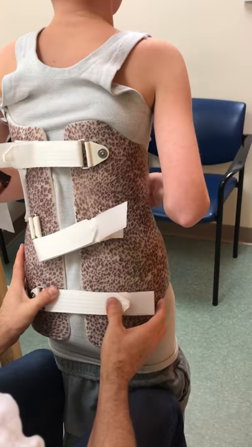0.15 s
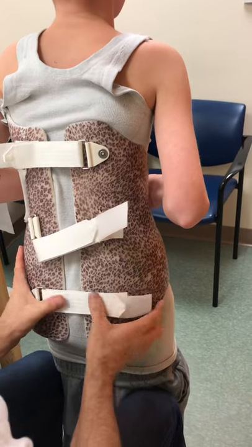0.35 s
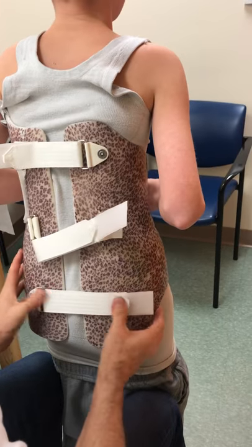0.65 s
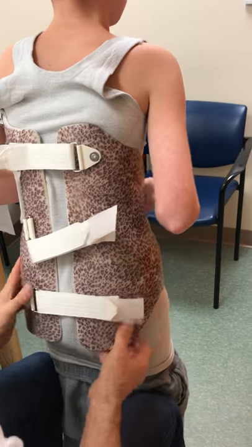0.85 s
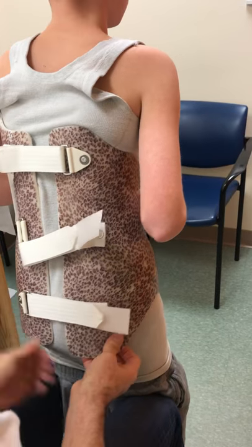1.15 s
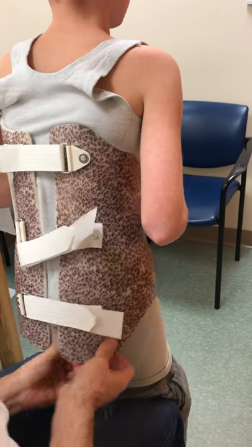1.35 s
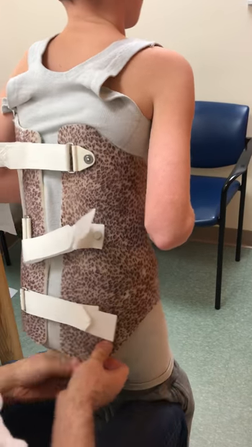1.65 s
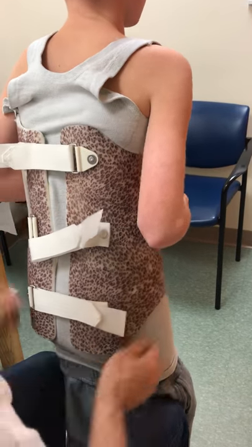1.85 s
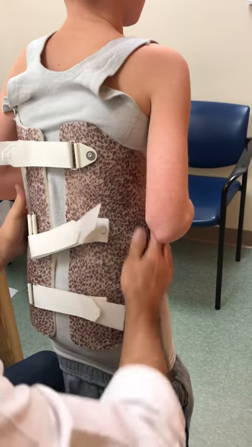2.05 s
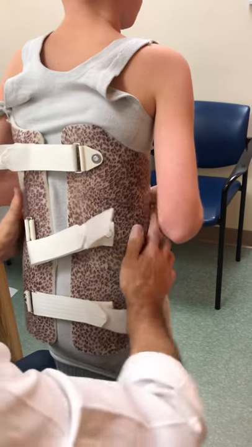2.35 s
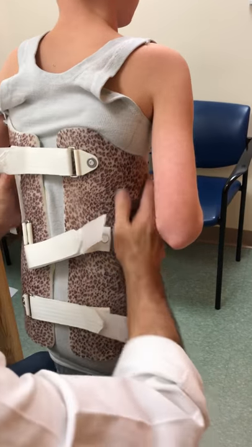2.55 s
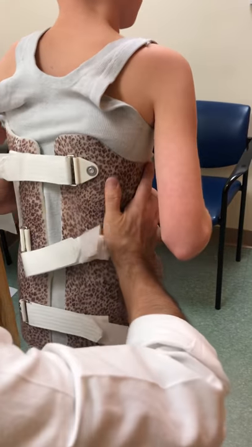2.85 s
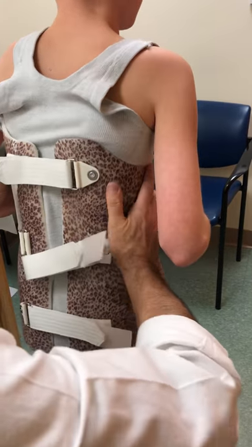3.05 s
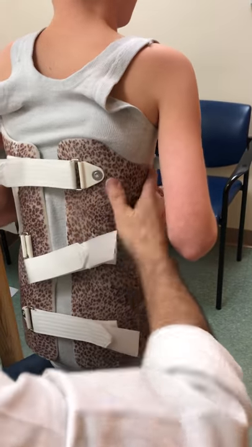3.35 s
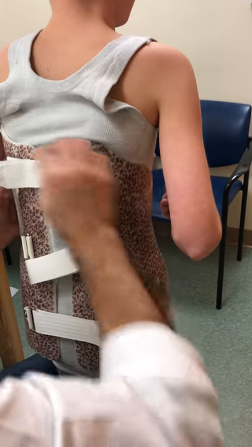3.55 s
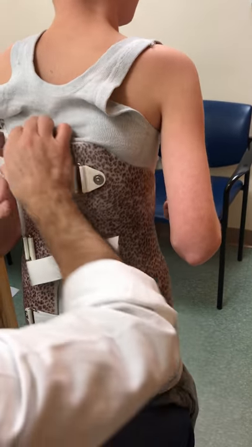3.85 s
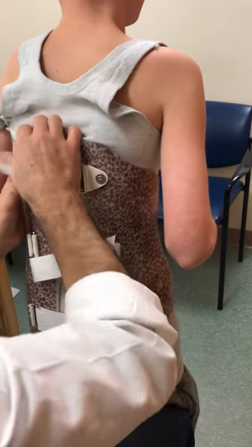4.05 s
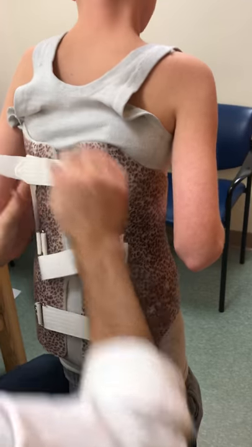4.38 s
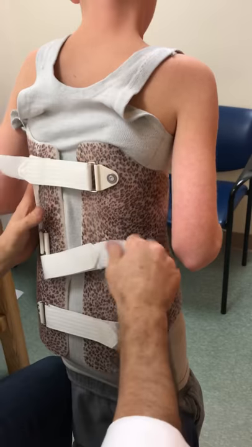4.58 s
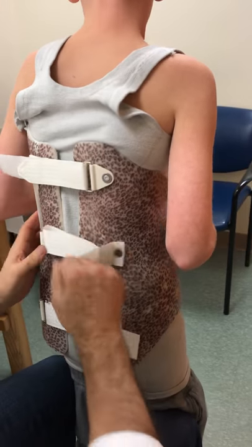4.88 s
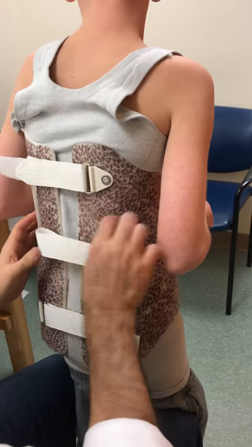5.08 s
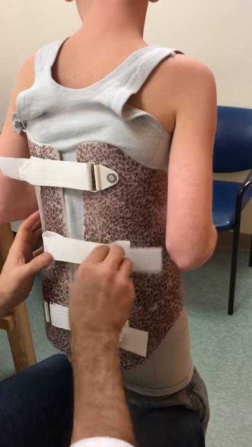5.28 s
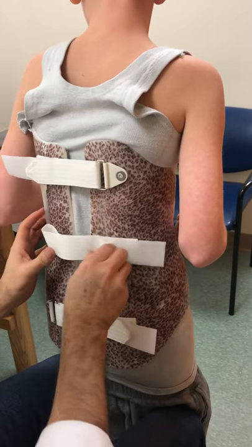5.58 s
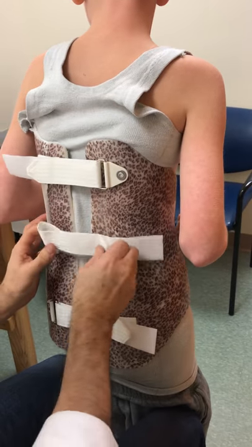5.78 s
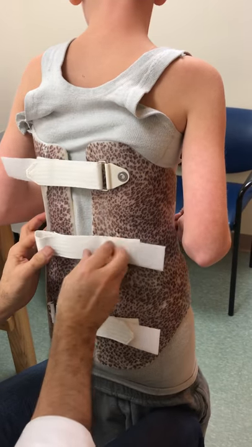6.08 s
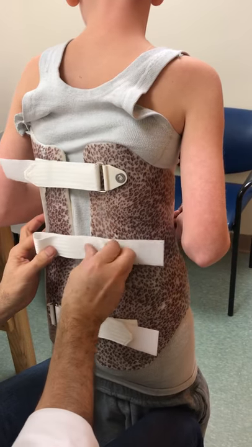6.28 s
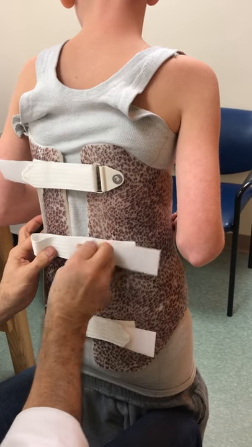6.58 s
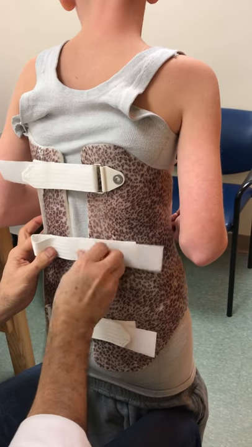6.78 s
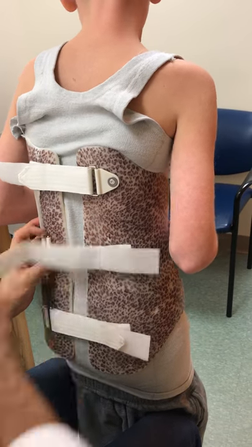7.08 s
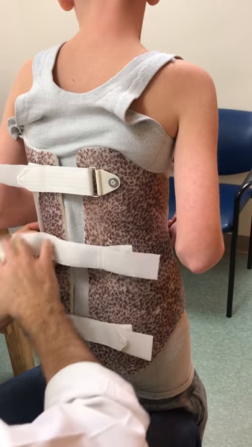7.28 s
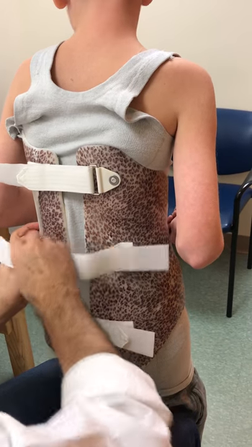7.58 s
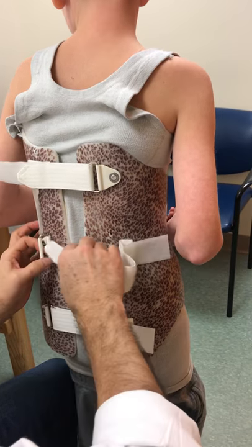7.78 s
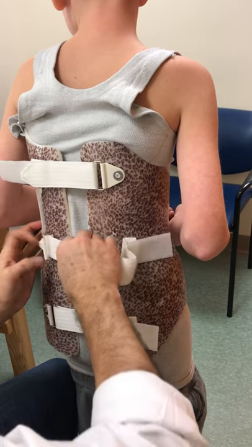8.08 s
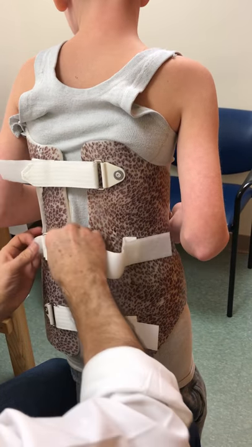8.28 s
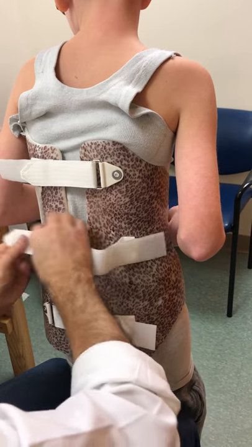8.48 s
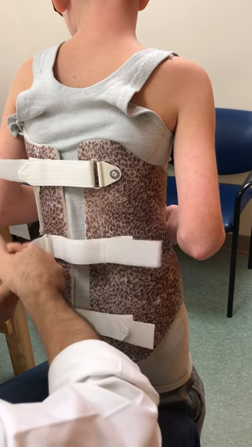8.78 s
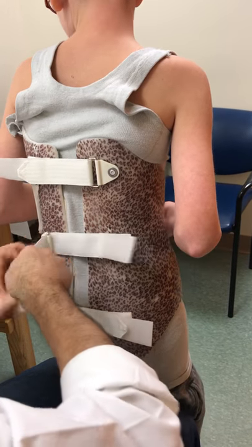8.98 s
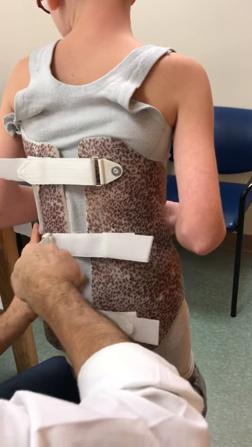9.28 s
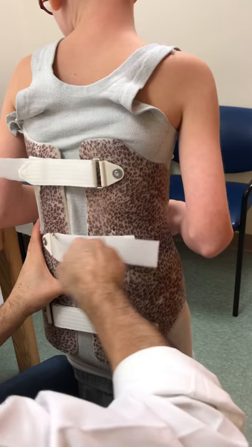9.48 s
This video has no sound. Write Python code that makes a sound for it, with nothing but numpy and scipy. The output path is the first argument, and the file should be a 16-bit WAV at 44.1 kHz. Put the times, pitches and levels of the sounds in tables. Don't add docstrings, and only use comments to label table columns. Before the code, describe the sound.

Close crackles and rustles of webbing on hard plastic, two loud fastener rips past the middle, then lighter scratchy fiddling in a small room.

```python
import sys
import numpy as np
from scipy import signal
from scipy.fft import rfft, irfft, next_fast_len
from scipy.io import wavfile
from scipy.ndimage import uniform_filter1d, map_coordinates

SR = 44100
rng = np.random.default_rng(int(sys.argv[2]) if len(sys.argv) > 2 else 0)


def magnitude_from_level(level_db):
    exponent = np.asarray(level_db, float) / 20
    return 10 ** exponent


def master_out(mix):
    frames = np.transpose(np.atleast_2d(mix))
    ceiling = np.clip(frames, -1, 1)
    pcm = np.round(ceiling * 32767).astype(np.int16)
    wavfile.write(sys.argv[1], SR, pcm)


N = 425124

# time in seconds, peak level in dB, tape
# ring in Hz, sizzle in dB against the peak.
HOOK_SNAPS = [(0.0607, -28.5, 3800, -4), (0.226, -39, 6800, 0), (0.231, -38, 3940, -9),
              (0.2395, -38.5, 6500, 0), (0.253, -41, 6800, -6), (0.264, -42, 6500, -2),
              (0.297, -41, 3700, -9), (0.352, -38, 3320, -10), (0.37, -52, 4500, -8),
              (0.659, -38, 3700, -14), (0.664, -38, 3700, -13), (0.72, -49, 3440, -15),
              (0.7505, -40, 6150, -2), (0.887, -42, 7500, -2), (0.98, -44, 8600, -2),
              (0.2899, -34, 3800, -8), (0.344, -35, 3900, -22), (0.4076, -31.5, 3800, -18),
              (0.552, -34, 5230, -5), (0.5814, -35, 6060, -13), (0.6488, -21, 3620, -30),
              (0.6978, -25, 3700, -28), (0.7325, -37, 3950, 5.5), (0.7442, -27.5, 3450, -23),
              (0.788, -36, 4260, -1), (0.832, -30, 3750, -5), (0.8938, -25.5, 6600, -23),
              (0.8979, -28, 3620, -23), (0.901, -35, 7140, -24), (0.997, -34.5, 8350, -6),
              (1.082, -40.5, 6960, -7), (1.3432, -30, 1320, 0), (1.4883, -29, 8850, -24),
              (1.5184, -34, 5570, -7), (1.5322, -35.5, 3940, 8), (1.631, -42, 3680, 12.5),
              (2.0367, -28, 4530, -28), (2.2192, -43, 8700, 3), (2.2277, -36, 7000, -12.5),
              (2.2784, -31, 4600, -8),
              (2.456, -45.5, 3240, -22), (2.934, -48, 1540, -23), (2.96, -37, 5840, -34),
               (3.029, -39.5, 1530, -33), (3.0524, -46, 3880, 0), (3.096, -47.5, 8200, 10),
               (3.215, -41.5, 1990, -10), (3.259, -38, 2220, -30), (3.347, -43, 1600, -32),
               (3.8166, -31, 8400, 3), (3.827, -29, 9000, -21), (3.8476, -30.5, 6250, -14),
               (4.0977, -32, 4330, -7), (4.255, -41, 7500, -4), (4.333, -24.5, 1680, -6),
               (5.363, -43.5, 7950, 14), (4.4852, -34, 9000, -20), (4.704, -42, 6450, -3),
               (4.7138, -28, 2900, -11), (4.7861, -27.5, 3700, -19), (4.7954, -37.5, 12000, 3),
               (4.897, -24, 3480, -2), (5.0745, -45.5, 7400, 5), (5.095, -28, 4440, 5),
               (5.378, -29, 3780, -30), (5.465, -38, 7100, -1.5), (5.5448, -33, 4670, -4),
               (5.697, -37.5, 3750, 4), (5.739, -38, 4270, -2), (5.769, -33.5, 6400, -4.5),
               (5.856, -40.5, 2950, 8.5), (6.0025, -34, 7250, 2), (6.0914, -33, 3000, 1),
              (6.3027, -37, 3860, 7), (6.3255, -35.5, 3120, 2), (6.3334, -16.5, 2850, 5.5),
              (6.356, -18.5, 3180, -5.5), (6.3718, -17.5, 3850, -16.5), (6.3714, -19, 7100, -22),
              (6.3751, -23, 8950, -7), (6.3835, -39.5, 13000, 2), (6.3934, -19.5, 4200, 1.5),
              (6.4282, -26.5, 2580, -11), (6.513, -31, 1480, -30), (6.5845, -32, 2700, -3.5),
              (6.322, -33, 3340, 2), (6.3417, -28, 3000, -4), (6.349, -36.5, 3200, -4),
              (6.3627, -37, 7000, -3), (6.85, -35, 3400, 1), (6.899, -30, 4200, -2),
              (6.9024, -15, 4600, -13), (6.9298, -28, 7000, 0), (6.9412, -19, 6460, -4),
              (6.944, -18, 4500, -20), (6.9513, -10, 3800, -4.5), (6.953, -16, 7260, -1.5),
              (6.958, -20.5, 4080, -16.5), (6.9635, -18.5, 3600, -6), (6.9788, -20, 3720, -13),
              (6.9968, -25.5, 3800, -14), (7.0008, -15.5, 3500, -1), (7.0478, -9, 3570, -1),
              (7.0253, -17.5, 6200, 0.5),
              (6.6143, -18.5, 3970, 4), (6.6185, -12.5, 2440, -14), (6.6215, -24, 4000, -7),
             (6.6252, -8, 5100, -24), (6.627, -19, 3780, -8), (6.629, -19.5, 6900, -13),
             (6.631, -11.5, 3030, -2), (6.636, -20.5, 6700, -3), (6.64, -26, 3520, -12),
             (6.643, -19, 2780, -7), (6.646, -26, 7000, 5), (6.649, -16, 3700, -3),
             (6.653, -20.5, 3300, -1), (6.6565, -21, 2970, -2.5), (6.6631, -15.5, 3760, -10),
             (6.6684, -25, 3180, -9), (6.672, -24, 3580, -5.5), (6.676, -23, 3280, -1),
             (6.6786, -16, 3200, -22), (6.694, -20, 6300, -16),
              (7.345, -38, 14000, 6), (7.36, -37, 12000, -1), (7.369, -32, 8900, 2),
                (7.516, -51, 8000, -8), (7.575, -37, 12000, -1), (7.596, -31, 14000, -3),
                (7.624, -42, 13000, -1.5), (7.742, -47, 12000, 0), (9.39, -53, 12000, 2),
                (7.4412, -35, 3200, 8.5), (7.788, -46, 9000, -6), (7.7251, -40.5, 6650, -15),
                (7.8394, -32, 2300, 6), (7.863, -42, 8560, 0), (7.9028, -29, 4430, -1.5),
                (8.011, -44, 3300, -22), (8.061, -31.5, 7100, 3.5), (8.0902, -29.5, 6000, 1),
                (8.121, -28.5, 6700, -5), (8.2248, -32, 6170, -12), (8.2572, -39, 2700, 5),
                (8.289, -38.5, 4200, 3), (9.2007, -35, 11300, 4.5), (8.949, -46, 11900, 2),
                (9.001, -33.5, 3220, 3), (9.088, -41, 9000, 1), (9.233, -44.5, 12000, 5),
                (9.274, -47, 11900, 4), (9.317, -48, 7540, 1), (8.842, -34, 6500, -4),
                (8.385, -40.5, 1950, 7), (8.5, -36, 2920, -8), (8.52, -35.5, 1900, -13),
                (8.662, -33, 2740, -19), (8.705, -50, 6350, 12), (8.7495, -38, 7600, 7),
                (8.7803, -29, 8950, 4), (9.18, -30.5, 12000, 5), (9.411, -37, 6100, 3),
                (9.4261, -32.5, 8660, -1), (9.4413, -36, 8150, 2)]
# time in seconds, peak level in dB, tape ring in Hz, sizzle
# in dB against the peak.
SMALL_TICKS = [(0.108, -32, 8830, -8), (0.163, -34, 3890, 6), (0.186, -37, 3970, -6),
               (0.2202, -32, 4140, -8), (0.3226, -33.5, 3560, -9), (0.3346, -28, 3610, -14),
               (0.3822, -33, 3910, -10), (0.3912, -23.5, 3350, -10), (0.399, -25, 4090, -7),
               (0.469, -32, 8450, -3), (0.5896, -33, 6900, -6), (0.61, -24, 5600, -8),
               (1.013, -29, 11100, -8), (2.1554, -40, 2140, -8), (2.1992, -34.5, 2200, -17),
               (2.469, -42, 1660, -8), (2.844, -36, 11400, -6), (2.9026, -35.5, 5600, -13),
               (3.1207, -35, 5690, 1), (3.164, -38, 2130, 0), (3.284, -40, 4580, -12),
               (3.3872, -36.5, 1730, -18), (3.481, -41, 6450, 5),
               (5.1555, -27, 4220, -14), (5.375, -17, 2320, -15), (5.4586, -21.5, 6480, -4),
              (5.512, -30, 3770, -3), (5.688, -36, 3630, -1), (5.7357, -28, 4100, -6),
              (5.844, -42, 2770, -5), (5.8952, -36, 2450, 2), (5.9628, -31, 2880, -6),
              (6.281, -40, 3800, -8), (6.793, -31, 6470, -10), (6.8665, -24, 3150, -10),
              (8.275, -30, 2660, -6), (8.3004, -29, 3030, -3), (8.4057, -26.5, 2510, -5),
              (8.4538, -29.5, 3300, 7), (8.4774, -39, 1710, -8), (8.488, -23.5, 2920, -3),
              (8.548, -32, 1520, -8), (8.5706, -26, 2730, 1), (8.586, -26, 4300, 4.5),
              (8.038, -36, 6000, 1)]
TICK_DB = -9

# start in seconds, held time in seconds, rasp level in dB, shell level in dB,
# sizzle level in dB.
HAND_STROKES = [(0, 0.35, -57.5, -64, -59.5), (.39, 0.011, -48.5, -55, -54),
                (.58, 0.08, -53.5, -64.5, -55), (.7, 0.092, -54, -62, -56), (.89, 0.035, -51.5, -59, -61),
                (1.0, 0.054, -62, -64, -75), (1.49, 0.052, -51, -58.5, -50), (1.651, 0.011, -56, -59, -61),
                (1.717, 0.17, -63, -65.5, -64), (2.15, 0.016, -60.5, -61, -63),
                (.46, 0.15, -58, -65.5, -60), (2.5, 0.13, -56, -59.5, -60), (2.64, .13, -64.5, -69.5, -68),
                (2.85, 0.12, -71, -69.5, -77), (3.111, 0.018, -61, -65, -70), (3.25, 0.014, -71, -61, -77),
                (3.41, 0.16, -89, -70, -69.5), (3.52, 0.32, -68.5, -86, -77),
                (4.03, 0.038, -55.5, -66.5, -57), (3.827, 0.11, -50.5, -65.5, -52),
                (4.099, 0.043, -51, -66, -58), (4.2, 0.17, -55, -64, -60),
                (4.507, 0.0071, -59, -61.5, -65),
                (4.86, 0.016, -54, -62, -58), (5.341, 0.023, -51.5, -59, -57),
                  (5.439, 0.098, -53.5, -65.5, -57.5), (5.65, .28, -63, -70.5, -70),
                  (5.975, 0.041, -48, -61.5, -58), (6.085, 0.0059, -51, -60.5, -66),
                  (6.19, 0.13, -65.5, -93, -66), (6.44, 0.047, -57, -68, -62), (6.534, 0.02, -51, -58, -67),
                  (6.76, .01, -55, -72, -60), (6.847, 0.0044, -44, -59.5, -46.5),
                  (6.885, 0.069, -61, -67, -65),
                (7.25, 0.13, -61.5, -63.5, -62.5), (7.352, 0.036, -50, -62, -56),
                (7.455, 0.044, -52.5, -53.5, -59), (7.58, 0.024, -54, -54, -51.5),
                (7.735, 0.0045, -63, -76, -53), (8.083, 0.014, -46.5, -53, -64),
                (8.269, 0.028, -53.5, -55.5, -67), (8.369, 0.043, -58.5, -60.5, -57),
                (8.469, 0.029, -45.5, -53, -60), (8.585, 0.022, -47, -52.5, -62),
                (8.792, 0.055, -42.5, -49, -45), (8.7, 0.0064, -60, -56, -58),
                (8.963, 0.068, -47.5, -55, -53), (9.091, 0.16, -53, -85, -52.5),
                (8.015, 0.035, -62.5, -65, -78), (9.451, 0.061, -49.5, -70, -49),
                (9.62, .05, -58.5, -78, -58)]
# start in seconds, held time in seconds, rasp level in dB, shell level in dB, sizzle level in dB.
JOLTS = [(1.346, 0.097, -59.5, -76, -76), (4.335, 0.0059, -38, -54, -51), (4.715, 0.004, -51, -57, -71),
         (4.783, 0.013, -47, -47, -51), (4.899, 0.01, -47, -52, -62), (5.092, 0.058, -38.5, -43.5, -42.5),
         (5.379, 0.0087, -68, -51.5, -66), (7.842, 0.008, -51, -60, -68)]
# middle in seconds, half length in seconds.
PALM_GLIDES = [
    (2.62, 0.15),
    (5.172, 0.078),
]
# time in seconds, peak level in dB, pitch in Hz.
BUMPS = [(1.033, -42, 334), (1.344, -44, 1090), (1.883, -37, 650), (3.12, -39.5, 724), (3.419, -45, 650),
         (4.897, -27.5, 860), (4.8977, -31.5, 415), (2.037, -43, 1330), (8.012, -44, 620),
         (8.095, -37, 650), (8.275, -40.5, 637), (8.37, -41, 905), (8.478, -37.5, 420), (8.632, -36.5, 920),
         (3.895, -35, 885), (2.928, -46, 1010), (2.437, -49.5, 804), (4.784, -38, 634),
         (4.8955, -20.5, 1520), (5.155, -40, 400), (5.377, -28, 1690), (7.902, -31.5, 1100),
         (8.058, -37.5, 600), (8.128, -34, 684), (8.499, -42, 604), (8.661, -33.5, 680)]
# time in
# seconds, half length in seconds, pitch in Hz, level in dB.
SCRAPES = [
    (3.431, 0.023, 706, -49.5),
    (3.506, 0.012, 720, -50),
    (4.8, 0.018, 605, -48.5),
    (5.364, 0.0034, 6540, -42),
    (8.838, 0.023, 4700, -45),
    (9.499, 0.026, 3040, -46),
]
# time in seconds,
# force in dB, tape ring in Hz.
PULLS = [
    [(6.616, -25, 3500), (6.635, -40, 3800), (6.66, -43.5, 3400), (6.685, -56, 3400)],
    [(6.943, -27.5, 4500), (6.948, -32, 4500)],
    [(6.9645, -24.5, 3960), (6.98, -21.5, 3650), (6.995, -21.5, 3230), (7.02, -27, 5140),
     (7.039, -22, 5160), (7.05, -19, 3620), (7.06, -19.5, 4250), (7.073, -19, 4020), (7.08, -34.5, 3860)],
]

# frequency in Hz, gain in dB.
TAPE = [(900, -70), (1800, -14.5), (2600, 1), (3600, 5), (5000, 2), (7000, 4.5), (9000, 2), (10500, -13.5),
        (12000, 3.5)]
# frequency in Hz, gain in dB.
SIZZLE = [(8000, -6.5), (10000, 4.5), (11500, 4.5), (15500, 11)]
# centre in Hz, width in Hz, gain in dB.
SHELL = [(334, 80, -2.5), (654, 157, 3), (1080, 317, 0.5), (1510, 360, 2), (2300, 990, -7)]
# centre in Hz, width in Hz, rms level in dB.
HUM = [(60.6, 5.1, -58.5), (118, 9.3, -80.5), (175.3, 3.4, -62.5), (230.3, 1, -71.5)]
# frequency in Hz, density in dB per Hz.
AIR = [(12, -55), (22, -30), (44, -6.5), (107, -8.5), (337, -15), (459, -23.5), (1660, -26.5),
       (16000, -37.5)]
# frequency in Hz, time to fall 60 dB in seconds.
ROOM = [(300, 0.46), (1000, 0.29), (4000, 0.22), (14000, 0.17)]
# delay in seconds, level in dB.
WALLS = [(.0051, -15), (.009, -25)]
# frequency in Hz, gain in dB.
PHONE_RESPONSE = [(10100, 0), (10500, -3), (10900, -0.5), (15700, -6.5), (15950, -34.5), (17500, -31)]

AIR_DB = -52
HOOK_SWINGS = 0.62
SNAP_RISE_S = 0.00022
HUE_WIDTH = 0.95
SLACKENS = 0.12
PULL_KNOCK_DB, PULL_SIZZLE_DB = -6, 2
BRIGHTENS = 0.62
KNOCK_SHRINKS = 0.75
PULL_RING = 1.7
LOWEST_HZ = 392
RISE_DB_PER_S, FADE_DB_PER_S = 424, 278.5
JOLT_RISE_DB_PER_S = 4000
REST_DB = -79
PALM_CALMS_DB = 8
CRACKLE_MELTS = 0.17


def unit(x):
    return x / np.sqrt(np.mean(x ** 2) + 1e-20)


def along(points, hz):
    f, v = np.transpose(points)
    return np.interp(np.log(hz + 1), np.log(f + 1), v)


def filtered(x, response):
    m = next_fast_len(N + SR // 2)
    gain = response(np.fft.rfftfreq(m, 1 / SR))
    level = unit(np.abs(gain))
    return irfft(rfft(x, m) * level * np.exp(1j * np.angle(gain)), m)[:N]


def tape(f):
    return magnitude_from_level(along(TAPE, f))


def sizzling(f):
    return magnitude_from_level(along(SIZZLE, f))


def shell(f):
    total = 0
    for k, (centre, width, db) in enumerate(SHELL):
        mode = 1j * f * width / (centre * centre - f * f + 1j * f * width)
        total = total + (-1) ** k * magnitude_from_level(db) * mode
    return total


def scatter(times, shapes):
    at = np.round(times * SR).astype(int)[:, None] + np.arange(shapes.shape[1])
    return np.bincount(at.ravel(), shapes.ravel(), N + SR)[:N]


def snaps(times, db, ring_hz, knock_db, sizzle_db, ring=.5, life=.004, swings=HOOK_SWINGS):
    t = np.arange(260) / SR
    c = ring_hz[:, None]
    rise = 1 - np.exp(-(t / SNAP_RISE_S) ** 2)
    crack = rise * magnitude_from_level(-60 * t / life) * rng.standard_normal((len(times), len(t)))
    swing_s = swings * life
    sag = 1 + SLACKENS * (1 - t / (swing_s / 2))
    tone = rise * magnitude_from_level(-60 * t / swing_s) * np.sin(2 * np.pi * c * t * sag)

    def even(x):
        return x / np.sqrt(np.mean(x[:, :44] ** 2, 1))[:, None]

    def excite(level_db, shape):
        return scatter(times, magnitude_from_level(level_db)[:, None] * shape)

    f = np.fft.rfftfreq(len(t), 1 / SR)
    around_ring = 1j * f * c / (c * c - f * f + 1j * f * c * HUE_WIDTH)
    rattle = even(irfft(rfft(crack) * around_ring, len(t)))
    crack = even(crack)
    rasp = filtered(excite(db, rattle), tape) + excite(db, ring * tone)
    sizzle = filtered(excite(db + sizzle_db + 0.25, crack), sizzling)
    knock = filtered(excite(db + knock_db, crack), shell)
    return rasp + sizzle + knock


def ventilation():
    t = np.arange(N) / SR
    air = magnitude_from_level(AIR_DB - 7.5) * filtered(rng.standard_normal(N), lambda f: magnitude_from_level(along(AIR, f)))
    for hz, width, db in HUM:
        waver = filtered(rng.standard_normal(N), lambda f: 1 / (1 + ((f - hz) / width) ** 2))
        core = 0.2 * np.sin(2 * np.pi * hz * t)
        air = air + magnitude_from_level(db) * unit(waver + core)
    return air


def strokes(rows, jolts):
    t, power = np.arange(0, N, 32) / SR, magnitude_from_level(2 * REST_DB)
    for rise, table in ((RISE_DB_PER_S, rows), (JOLT_RISE_DB_PER_S, jolts)):
        for s, held, *db in table:
            loss_db = rise * np.maximum(s - t, 0) + FADE_DB_PER_S * np.maximum(t - s - held, 0)
            power = power + magnitude_from_level(2 * (np.array(db)[:, None] - loss_db))
    return [np.interp(np.arange(N) / SR, t, 10 * np.log10(p)) for p in power]


def patchy(x, depth_db):
    z = signal.stft(x, nperseg=256)[2]
    field = uniform_filter1d(rng.standard_normal(z.shape), size=5, axis=0)
    field = uniform_filter1d(field, size=12, axis=1)
    gain = magnitude_from_level(depth_db * unit(field))
    return signal.istft(z * unit(gain), nperseg=256)[1][:N]


def rubbing():
    rasp_db, shell_db, sizzle_db = strokes(HAND_STROKES, JOLTS)
    flutter_hz = 30
    knots = rng.standard_normal(int(N * flutter_hz / SR) + 4)
    flutter_db = 2.2 * map_coordinates(knots, [np.arange(N) * flutter_hz / SR])
    drive = unit(magnitude_from_level(flutter_db) * rng.standard_normal(N))
    rasp = magnitude_from_level(rasp_db - 1.5) * filtered(drive, tape)
    sizzle = magnitude_from_level(sizzle_db + 0.5) * filtered(drive, sizzling)
    body = magnitude_from_level(shell_db - 3.5) * filtered(drive, shell)

    draw = rng.random((7000, 5))
    at = (draw[:, 0] * (N - 1)).astype(int)
    size_db = np.minimum(-3.5 * np.log(draw[:, 1]), 10) - 4.5
    size_db = size_db - CRACKLE_MELTS * np.maximum(rasp_db[at] + 56, 0)
    for s, half in PALM_GLIDES:
        size_db = size_db - PALM_CALMS_DB * (np.abs(at / SR - s) < half)
    knock_db = (shell_db - rasp_db)[at] + 16 * draw[:, 2] - 7.5
    bright_db = (sizzle_db - rasp_db)[at] + 16 * draw[:, 3] - 3.0
    ring_hz = 2000 * 4.5 ** draw[:, 4]
    crackle = snaps(at / SR, rasp_db[at] + size_db, ring_hz, knock_db, bright_db, ring=0.59, life=0.0041)
    return patchy(rasp + sizzle + body, depth_db=3.0) + crackle


def hooks():
    ticks = np.array(SMALL_TICKS) + [0, TICK_DB, 0, 0]
    rows = np.vstack([HOOK_SNAPS, ticks])
    s, db, ring_hz, sizzle_db = rows.T
    knock_db = -14 - 7 * np.log2(ring_hz / 3500)
    return snaps(s, db - 5.5, ring_hz, knock_db, sizzle_db + 8.5, ring=4.6, life=0.0056)


def bumps():
    t = np.arange(2600) / SR
    s, db, hz = np.array(BUMPS).T[:, :, None]
    decay = magnitude_from_level(-60 * t * np.maximum(hz, 600) / 9)
    note = np.sin(2 * np.pi * hz * t) * decay * (1 - np.exp(-t / 0.00015))
    puff = magnitude_from_level(db - 13.5 - 60 * t / 0.078) * rng.standard_normal(note.shape)
    return scatter(s[:, 0], magnitude_from_level(db + 4.5) * note) + filtered(scatter(s[:, 0], puff), shell)


def scrapes():
    t, out = np.arange(N) / SR, 0
    for s, half, hz, db in SCRAPES:
        band = filtered(rng.standard_normal(N), lambda f: 1 / (1 + ((f - hz) / (0.2 * hz)) ** 2))
        out = out + magnitude_from_level(db) * np.exp(-((t - s) / half) ** 2) * band
    return out


def curves(spans, rest_db):
    def edge(row, step):
        return (row[0] + step, rest_db, *row[2:])

    rows = []
    for span in spans:
        rows += [edge(span[0], -0.0043), *span, edge(span[-1], 0.0036)]
    s, *cols = np.transpose(rows)
    return [np.interp(np.arange(N) / SR, s, c) for c in cols]


def rips():
    db, pull_hz = curves(PULLS, -98.5)
    knock_db = PULL_KNOCK_DB - KNOCK_SHRINKS * (db + 32)
    sizzle_db = PULL_SIZZLE_DB + BRIGHTENS * (db + 32.5)
    draw = rng.random((40000, 3))
    at = (draw[:, 0] * (N - 1)).astype(int)
    pulling = db[at] > -60
    at, draw = at[pulling], draw[pulling]
    size_db = np.minimum(-3.6 * np.log(draw[:, 1]), 14) - 12
    bursts = map_coordinates(rng.standard_normal(2000), [at * 200 / SR])
    size_db = size_db + 1.1 * bursts
    ring_hz = pull_hz[at] * 1.3 ** (draw[:, 2] - .5)
    return snaps(at / SR, db[at] + size_db, ring_hz, knock_db[at] + 0.47, sizzle_db[at],
                 ring=PULL_RING, life=0.0071, swings=0.97)


def room(x, piece=.25):
    out, step = np.zeros(N + SR), int(piece * SR)
    for a in range(0, N, step):
        hz, t, z = signal.stft(rng.standard_normal(SR // 2), SR, nperseg=256)
        decay = magnitude_from_level(-60 * t / along(ROOM, hz)[:, None])
        tail = signal.istft(z * decay, SR, nperseg=256)[1]
        wet = signal.fftconvolve(x[a:a + step], tail / np.linalg.norm(tail))
        start = a + 190
        out[start:][:len(wet)] += wet[:len(out) - start]
    early = sum(magnitude_from_level(db) * np.pad(x, (int(s * SR), 0))[:N] for s, db in WALLS)
    return magnitude_from_level(-9) * out[:N] + early


def scene():
    near = filtered(hooks() + rips(), lambda f: (1j * f / (LOWEST_HZ + 1j * f)) ** 2) + bumps()
    hands = rubbing() + scrapes()
    return (near + hands + room(near + 0.68 * hands) + ventilation())[None]


def top_cut(x):
    return signal.sosfilt(signal.butter(12, 17040, fs=SR, output="sos"), x)


def record(dry):
    soft = dry / (1 + np.abs(dry / .95) ** 4) ** .25
    m = next_fast_len(N)
    response = magnitude_from_level(along(PHONE_RESPONSE, np.fft.rfftfreq(m, 1 / SR)))
    heard = irfft(rfft(soft, m) * response, m)[:, :N]
    return top_cut(heard)


dry = scene()
out = record(dry)
master_out(out)
```